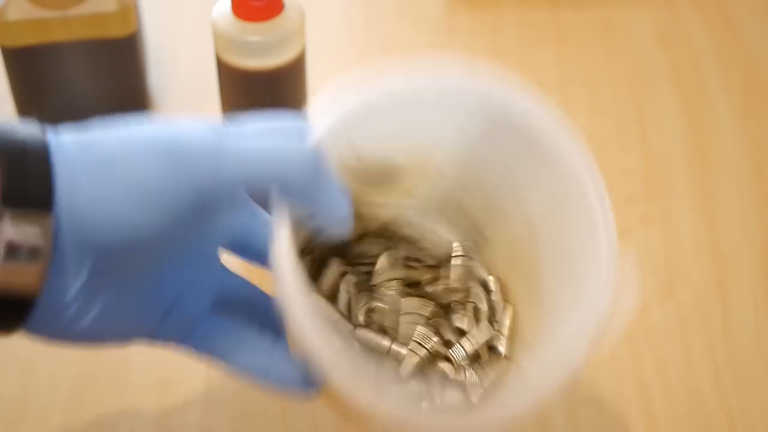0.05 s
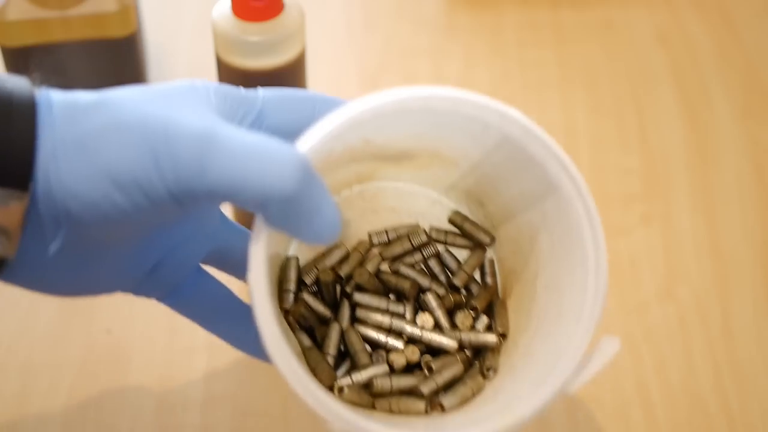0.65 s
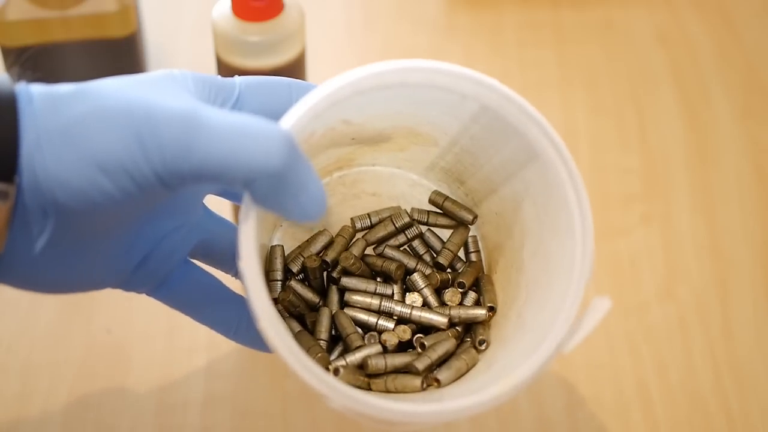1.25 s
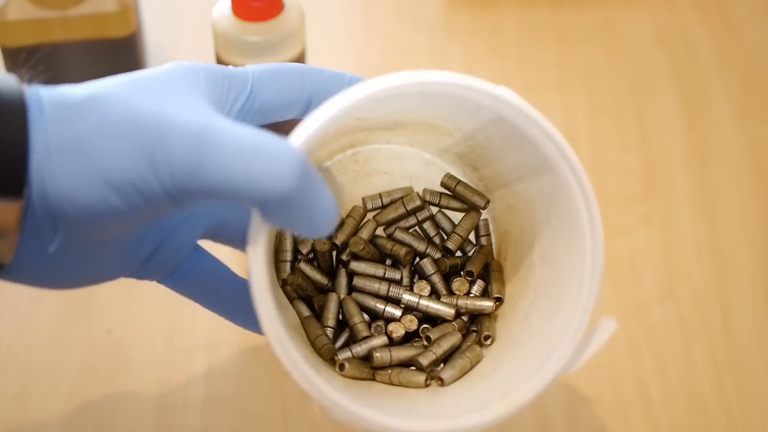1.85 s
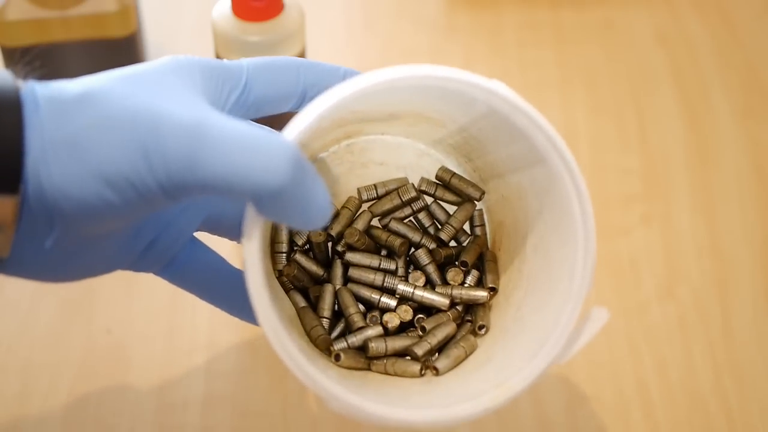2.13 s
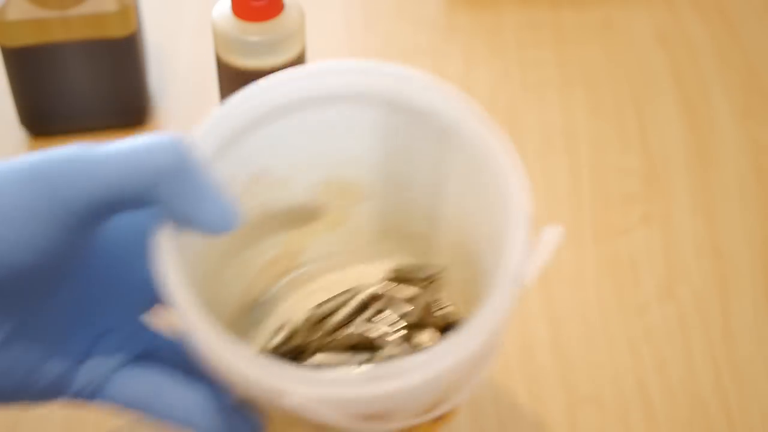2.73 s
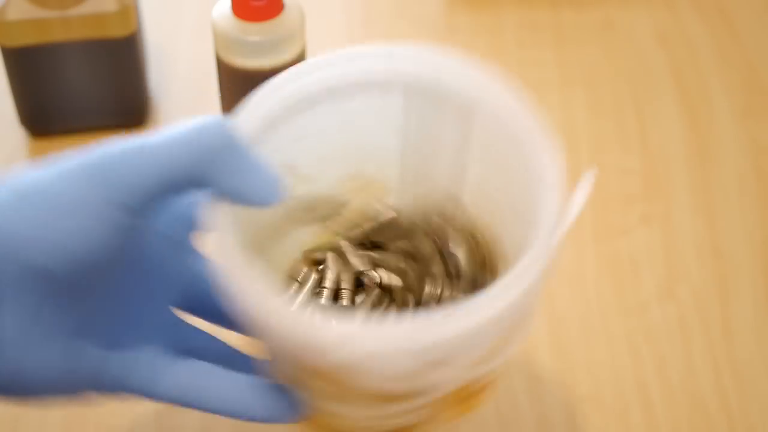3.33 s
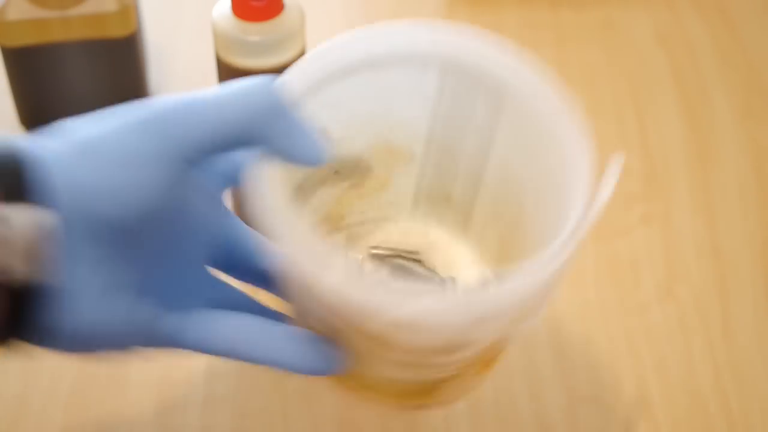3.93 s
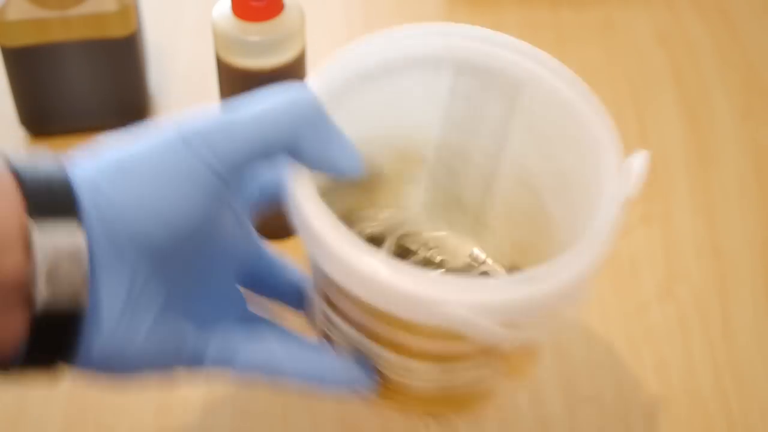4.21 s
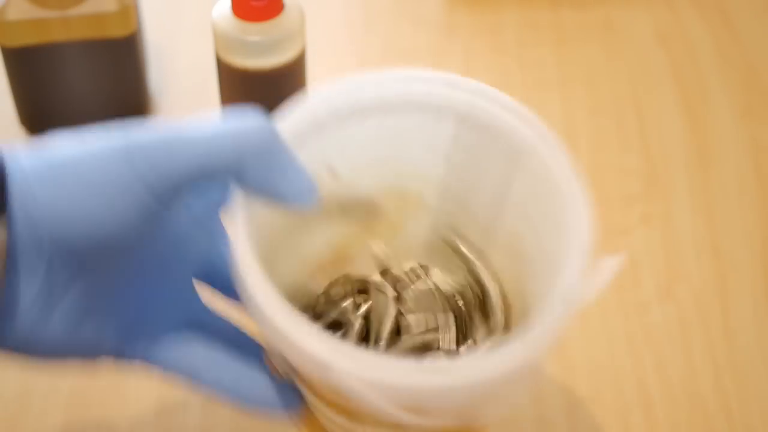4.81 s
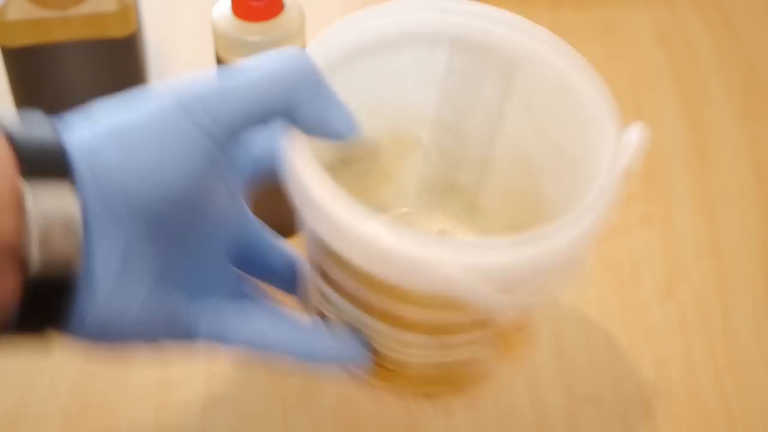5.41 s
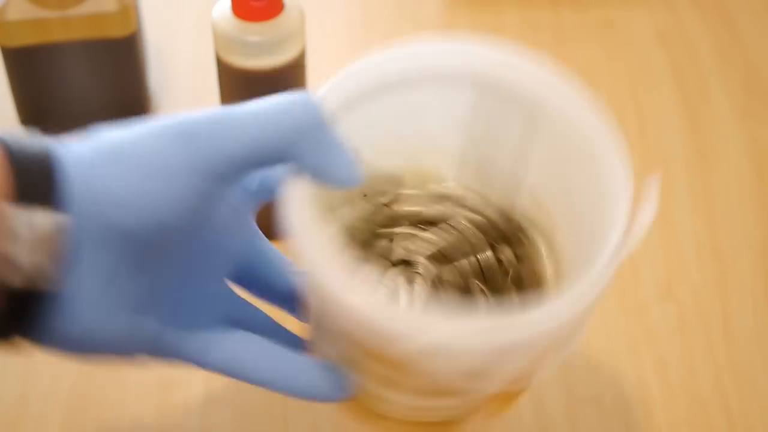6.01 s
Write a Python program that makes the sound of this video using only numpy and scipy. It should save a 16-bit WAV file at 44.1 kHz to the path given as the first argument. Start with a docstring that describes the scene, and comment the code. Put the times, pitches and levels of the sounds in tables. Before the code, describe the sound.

Close to the microphone, a short rattle of bullets swirled in a plastic bucket stops almost at once. Soft ventilation, a faint hum and slight rubbing from a gloved grip fill the gap. Then a longer bout of swirling begins: dense metallic clatter with hard clacks, bright ticks and hollow thumps, surging with each quick turn of the hand. The small room adds a short echo.

```python
"""Metal bullets swirled in a small plastic bucket, close in front of the microphone in a quiet room.
They clack against each other and the wall and drum on the plastic bottom, surging as each turn of the
hand throws the heap and lets it fall back. The swirl stops, the gloved hand shifts its grip, and a
longer bout begins. The bucket sits narrow in the centre; a short room tail, soft ventilation and a
faint mains hum lie behind it."""
import sys
import numpy as np
from scipy import signal
from scipy.fft import rfft, irfft
from scipy.io import wavfile
from scipy.ndimage import uniform_filter1d

SR = 44100
rng = np.random.default_rng(int(sys.argv[2]) if len(sys.argv) > 2 else 0)


def wrap_up_sound(samples):
    """Save the sound to the file named by the first command line argument, as 16-bit audio."""
    columns = np.atleast_2d(samples).T
    # keep every value between -1 and 1, then stretch to whole-number steps
    tamed = np.clip(columns, -1, 1)
    steps = np.round(tamed * 32767).astype(np.int16)
    wavfile.write(sys.argv[1], SR, steps)


N = 271656
TAPS = 16384
HZ = np.fft.rfftfreq(TAPS, 1 / SR)

# Levels in the tables are relative: each source adds its own gain.
# single clacks that stand out: start_s, level_db, pitch_hz
HARD_CLACKS = [(0.273, -7.5, 1580), (2.6645, -51, 3460), (2.8847, -42, 3220), (2.927, -39, 1600),
               (2.9746, -26, 1640), (3.038, -7.5, 1610), (3.0578, -4.5, 2360), (3.0904, -3, 2380),
               (3.1804, -9, 2520), (3.3223, -4, 2080), (3.4346, -7.5, 2440), (3.5783, -4.5, 2350),
               (3.7032, -6, 1700), (3.8158, 2.5, 2200), (3.9856, -8.5, 1760), (4.0718, 0.5, 2360),
               (4.1974, -4, 2350), (4.3036, -8.5, 1460), (4.5361, -3.5, 1770), (4.7989, -1, 2420),
               (5.078, -3.5, 1770), (5.1184, -4.5, 1620), (5.249, -7, 1590), (5.3843, -11, 1590),
               (5.7614, -6.5, 1690), (5.9331, -7.5, 1570), (6.0156, -6, 2400), (6.029, -5.5, 1470)]
# tone of a bullet's contact: frequency_hz, level_db
CLACK_SPECTRUM = [(30, -6.5), (100, -30.5), (300, -12.5), (800, 5), (1300, 0), (2000, -1.5), (3300, -2.5),
                  (4500, -4.5), (6000, -14), (8000, -19.5), (11000, -30), (16000, -54.5)]
# tone of the fine clicks: frequency_hz, level_db
CLICK_SPECTRUM = [(1500, -38.5), (4000, 4.5), (6000, 9), (8300, 6.5), (10400, 4), (12000, -7.5),
                  (14000, -30), (16000, -29.5)]
# resonances of the bucket wall: pitch_hz, width_hz, boost_db
WALL_MODES = [(1460, 35, 3.5), (1600, 130, 4.5), (1795, 290, 5), (2450, 250, 5), (3330, 570, 2.5),
              (4160, 320, 2), (5130, 250, 5.5)]
# knocks on the bottom, from light bumps to heavy falls: start_s, level_db
BOTTOM_THUMPS = [(0.017, 0.5), (0.169, -4.5), (0.273, -2.5), (2.283, -40), (2.598, -41), (2.928, -29.5),
                 (2.956, -22), (2.997, -12), (3.028, -6), (3.067, -9), (3.162, -2.5), (3.271, -2),
                 (3.447, -0.5), (3.547, 1), (3.649, -5), (3.802, -3), (3.942, -4), (3.984, -6), (4.07, -4),
                 (4.556, -4), (4.615, -4.5), (4.683, -2.5), (4.785, -1.5), (5.005, -3), (5.087, -4.5),
                 (5.124, -14), (5.171, -2.5), (5.636, -14), (5.821, -6), (6.046, -3)]
# modes of the loaded bottom and the air above it: pitch_hz, width_hz, level_db
BOTTOM_MODES = [(210, 9.3, -21), (284, 25, -16), (350, 54, -16), (425, 76, -15), (485.5, 23, -6),
                (559.6, 23, 2), (549, 16, -15), (608, 15, 0), (693, 16, -15.5), (693, 40, -15.5),
                (735, 42, -10), (873, 34, -18)]
# the heap rolling between surges, one list a bout: time_s, clatter_db, drum_db
ROLLING_BOUTS = [
    [(0.0, -27.5, -14.5), (0.27, -27.5, -19.5), (0.34, -32.5, -25)],
    [(2.93, -48, -41.5), (3.06, -22.5, -13.5), (3.7, -23, -13.5), (4.25, -24, -16), (4.95, -25.5, -19),
     (5.47, -29, -17), (5.85, -25, -13), (6.16, -32.5, -21.5)],
]
# turns of the hand, about four a second, each a throw at the wall and a fall back:
# start_s, throw_length_s, clatter_db, click_db, drum_db, fall_delay_s, fall_db
HAND_TURNS = [(0.0, 0.014, -21, -33, -17, 0.033, -6.5), (0.135, 0.041, -21, -33.5, -12.5, 0.089, -3.5),
              (3.05, 0.048, -26, -38, -14, 0.11, -6), (3.327, 0.054, -22, -34.5, -14, 0.1, -6),
              (3.601, 0.038, -23, -37, -16.5, 0.077, -1), (3.84, 0.039, -22, -35, -15, 0.095, -10),
              (4.069, 0.018, -22, -29, -12.5, 0.11, -1.5), (4.31, 0.032, -21, -31, -10, 0.12, -1.5),
              (4.534, 0.057, -24.5, -32, -12.5, 0.16, -1), (4.787, 0.055, -29, -34.5, -12, .12, -1),
              (5.013, 0.037, -19, -29.5, -11, 0.12, 2.5), (5.258, 0.032, -19, -32, -17, .11, 1.5),
              (5.52, 0.0073, -16, -30.5, -15, 0.11, 1), (5.761, 0.064, -24.5, -38.5, -18, 0.15, -7),
              (6.034, 0.051, -20, -31.5, -15, 0.091, -5.5)]
# the brightest ticks of metal edges: start_s, level_db
EDGE_TICKS = [(0.134, -23), (0.3985, -42), (3.092, -20), (3.6187, -15.5), (3.8137, -17), (3.864, -20),
              (4.0715, -19), (4.3043, -29), (4.361, -25), (5.0115, -22), (5.257, -18), (6.0482, -24)]
# tone of those ticks: frequency_hz, level_db
TICK_SPECTRUM = [(3000, -50.5), (7000, -9), (10500, 1), (13500, -9), (16000, 2)]
# the fingers shifting their hold: peak_s, rise_s, rub_db, flex_db
GRIP_SHIFTS = [(0.68, .03, -69.5, -63), (1.465, 0.019, -83, -47), (1.612, 0.033, -63, -52),
               (1.668, .01, -65, -60), (1.72, 0.02, -76, -53), (2.58, .01, -65, -59),
               (2.664, .01, -62, -50), (2.9, .1, -57, -52)]
# tone of the glove's rubbing: frequency_hz, level_db
RUB_SPECTRUM = [(300, 0), (700, 8.5), (1500, -1), (2400, -3), (3500, -6), (4300, -7), (8000, -13),
                (15000, -20)]
# stereo width of the close bucket: frequency_hz, side_gain_db
BUCKET_WIDTH = [(40, -21.5), (130, -26.5), (380, -41.5), (600, -26.5), (1000, -14.5), (2500, -12),
                (6000, -18), (10500, -19.5), (12500, -8.5), (15000, -1)]
# decay of the room: frequency_hz, t60_s
ROOM_DECAY = [(150, .55), (500, 0.56), (2000, 0.51), (8000, 0.52), (15000, 0.33)]
# stereo width of the room's tail: frequency_hz, side_gain_db
TAIL_WIDTH = [(100, -26), (380, -30), (600, -19), (1000, -8.5), (2000, -10.5), (5000, -9.5), (10000, -11),
              (14000, -6)]
# tone of the ventilation: frequency_hz, level_db
VENT_SPECTRUM = [(15, -37.5), (25, -29.5), (66, -23.5), (85, -24), (125, -12), (165, -12), (205, -4),
                 (260, -10), (420, -8), (720, -18.5), (1150, -26), (1600, -36.5), (4000, -45), (15500, -45)]
# stereo width of the ventilation: frequency_hz, side_gain_db
VENT_WIDTH = [(40, -2), (100, -27.5), (200, -30.5), (400, -24.5), (700, -11), (1000, -3), (1500, 3.5),
              (3500, 5.5), (8000, 0.5), (15000, -3.5)]
# partials of the mains hum: pitch_hz, level_db
MAINS_HUM = [(100, -60), (199.5, -61.5), (398.5, -63)]
# dips in the microphone's response: centre_hz, width_hz, gain_db
MIC_DIPS = [(3910, 46, -4), (4590, 76, -3), (5560, 80, -2.5), (9140, 410, -10.5), (15800, 2500, -11.5)]


def bullets(clattering, clicking, clatter_db=-2, clack_db=-3, snap_db=-15):
    """Bullets knock on each other and on the wall: dense clatter, fine clicks, single hard clacks."""
    dull = causal(curve(CLACK_SPECTRUM) + bells_db(WALL_MODES))
    sharp = causal(curve(CLICK_SPECTRUM))
    clatter = rattle(per_s=2000, spread_db=3.5, t60=0.014, scatter=1.46, span_hz=(920, 10000))
    clicks = rattle(per_s=1400, spread_db=3.5, t60=0.015, scatter=1.9, span_hz=(4000, 12100))
    out = amp(clatter_db) * steadied(through(clatter, dull), seconds=0.041) * clattering
    out += steadied(through(clicks, sharp), seconds=0.05) * clicking
    for start_s, level_db, pitch_hz in HARD_CLACKS:
        knock = through(contact(t60=0.026, scatter=1.54, hz=pitch_hz, q=3.4, clink=2.6), dull)
        snap = through(contact(t60=0.0059, scatter=0.52, hz=8060, clink=0.2), sharp)
        clack = unit_rms(knock) + amp(snap_db) * unit_rms(snap)
        add(out, start_s, amp(level_db + clack_db) * clack / abs(clack[0]).max())
    return out


def contact(t60, scatter, hz, q=4, clink=3.37):
    """Metal meets metal, in mid and side: a snap, milliseconds of scatter and a brief pitched clink."""
    t = np.arange(1024) / SR
    burst = rng.standard_normal((2, len(t))) * amp(-60 * t / t60)
    burst *= scatter / np.linalg.norm(burst, axis=1, keepdims=True)
    burst[:, 0] += [1, rng.choice([-1, 1])]  # the snap lands left or right
    return burst + clink * signal.lfilter(*signal.iirpeak(hz, q, fs=SR), burst)


def collisions(per_s, spread_db):
    """Impacts at random moments: many small, a few large."""
    strength = amp(spread_db * np.minimum(rng.exponential(1, N), 4)) * rng.choice([-1, 1], N)
    return strength * (rng.random(N) < per_s / SR)


def rattle(per_s, spread_db, t60, scatter, span_hz, places=256):
    """Collisions fall among places in the heap, each clinking at its own pitch."""
    hits = collisions(per_s, spread_db)
    place = rng.integers(0, places, N)
    clinks = [contact(t60, scatter, hz) for hz in np.geomspace(*span_hz, places)]
    out = np.zeros((2, N))
    for at in np.flatnonzero(hits):
        add(out, at / SR, hits[at] * clinks[place[at]])
    return out


def bucket_bottom(drumming, gain_db=-3, give_hz=570, dead_share=0.2, load_s=0.0021):
    """The heap drums on the plastic bottom; a heavy fall presses on it and deadens its ring."""
    modes = sum(amp(db) ** 2 * bell(hz, width) for hz, width, db in BOTTOM_MODES)
    ring = causal(10 * np.log10(modes + 1e-12))
    hits = np.array([collisions(per_s=900, spread_db=2.5) for _ in range(2)])
    out = steadied(through(hits, ring), seconds=0.03) * drumming
    pressed = modes * bell(give_hz, width_hz=520) + dead_share * bell(give_hz, width_hz=170) ** 2
    thump = causal(10 * np.log10(pressed + 1e-12))
    thump *= 1 - np.exp(-np.arange(len(thump)) / (load_s * SR))  # the load arrives gradually
    for start_s, level_db in BOTTOM_THUMPS:
        add(out[:1], start_s, amp(level_db) * thump / abs(thump).max())
    return amp(gain_db) * out


def swirling_hand(roll_click_db=-12.5, lull_db=-0.5, lull_lead_s=0.027):
    """Gains of clatter, clicks and drumming: the heap rolls, and each turn throws it and lets it fall."""
    t = np.arange(N) / SR
    power = np.zeros((3, N))
    for bout in ROLLING_BOUTS:
        time_s, clatter_db, drum_db = np.transpose(bout)
        for layer, db in zip(power, (clatter_db, clatter_db + roll_click_db, drum_db)):
            layer += amp(np.interp(t, time_s, db, left=-np.inf, right=-np.inf)) ** 2
    # just before a throw the heap lifts and rolls more quietly
    lulls = sum(swell(turn[0] - lull_lead_s, rise_s=0.017, fade_s=0.017) for turn in HAND_TURNS)
    power *= amp(lull_db * lulls) ** 2
    landing = amp([-24.5, -38.5, -14.5])  # a fall lands mostly on the bottom
    for start_s, length_s, clatter_db, click_db, drum_db, delay_s, fall_db in HAND_TURNS:
        throw = swell(start_s, rise_s=0.006, hold_s=length_s, fade_s=0.027)
        fall = swell(start_s + delay_s, rise_s=0.012, hold_s=0.031, fade_s=0.03)
        power += np.outer(amp([clatter_db, click_db, drum_db]), throw) ** 2
        power += np.outer(landing * amp(fall_db), fall) ** 2
    return np.sqrt(power)


def metal_edges(clicking, tick_db=4, glint_db=-53, usual_click_db=-34, steepness=1.2):
    """Metal edges meet with thin bright ticks, mostly when the heap is thrown hard."""
    colour = causal(curve(TICK_SPECTRUM))
    glints = rattle(per_s=110, spread_db=8, t60=0.016, scatter=3, span_hz=(10000, 14500), places=96)
    force = (clicking / amp(usual_click_db)) ** steepness
    out = amp(glint_db) * unit_rms(through(glints, colour)) * force
    for start_s, level_db in EDGE_TICKS:
        tick = through(contact(t60=0.014, scatter=3, hz=rng.uniform(9750, 13000), clink=0.8), colour)
        add(out, start_s, amp(level_db + tick_db) * tick / abs(tick[0]).max())
    return out


def gloved_grip(rub_gain_db=-1, scrape_hz=3400, scrape_db=7):
    """The grip shifts: glove and settling bullets rub faintly, and the plastic flexes low."""
    colour = causal(curve(RUB_SPECTRUM) + scrape_db * bell(scrape_hz, width_hz=800))
    grains = rattle(per_s=1200, spread_db=2, t60=0.019, scatter=1.5, span_hz=(700, 8970), places=96)
    rub = amp(rub_gain_db) * unit_rms(through(grains, colour))
    plastic = causal(20 * np.log10(bell(210, width_hz=66) + 0.47 * bell(480, width_hz=270) + 1e-6))
    flex = unit_rms(through(collisions(per_s=1400, spread_db=4), plastic))
    return sum(swell(peak_s, rise_s, fade_s=0.026) * (amp(rub_db) * rub + amp(flex_db) * flex)
               for peak_s, rise_s, rub_db, flex_db in GRIP_SHIFTS)


def room_tail(bucket, bass_db=-10, treble_db=-4, onset_s=0.009, turns_per_s=4.1, count=3):
    """The small room's diffuse tail, stronger in the treble; its echoes shift as the bucket circles."""
    hz, t, noise = signal.stft(rng.standard_normal((count, 2, SR)), SR, nperseg=256)
    decay_rate = np.log(1000) / curve(ROOM_DECAY, hz)[:, None]
    decay = np.exp(-decay_rate * t) * np.sqrt(2 * decay_rate / SR)  # equal energy in every band
    wet = amp(curve([(600, bass_db), (1400, treble_db)], hz))[:, None]
    tails = signal.istft(noise * wet * decay, SR, nperseg=256)[1]
    tails *= np.clip(np.arange(tails.shape[-1]) / (onset_s * SR) - 0.5, 0, 1)  # after the direct sound
    turn = turns_per_s * np.arange(N) / SR
    echoes = sum(through(bucket * np.cos(np.pi * (turn + k / count)), tail)
                 for k, tail in enumerate(tails))
    return np.sqrt(2 / count) * echoes


def room_tone(vent_db=-51.5, waver_rad=0.27, swing_db=1.5):
    """Soft ventilation noise all around, and a slightly wavering mains hum in the centre."""
    noise = through(rng.standard_normal((2, N)), causal(curve(VENT_SPECTRUM)))
    air = amp(vent_db) * unit_rms(noise)
    t = np.arange(N) / SR
    knots = np.linspace(0, N / SR, 24)
    for pitch_hz, level_db in MAINS_HUM:
        drift = waver_rad * np.interp(t, knots, rng.standard_normal(len(knots)))
        sag_db = swing_db * np.interp(t, knots, rng.standard_normal(len(knots)))
        air[0] += np.sqrt(2) * amp(level_db - sag_db) * np.sin(2 * np.pi * pitch_hz * t + drift)
    return air


def amp(db):
    """Decibels to gain."""
    return 10 ** (np.asarray(db) / 20)


def unit_rms(x):
    """Scales to an rms of one."""
    return x / np.sqrt(np.mean(x ** 2) + 1e-20)


def curve(points, hz=HZ):
    """Joins (frequency_hz, value) points on a log-frequency axis."""
    frequency_hz, value = np.transpose(points)
    return np.interp(np.log(hz + 1), np.log(frequency_hz + 1), value)


def bell(hz, width_hz):
    """Power response of one resonance."""
    return 1 / (1 + ((HZ ** 2 - hz ** 2) / (width_hz * (HZ + 1))) ** 2)


def bells_db(rows):
    """Response in decibels of a set of peaks or dips."""
    return sum(db * bell(hz, width_hz) for hz, width_hz, db in rows)


def causal(db):
    """The minimum-phase impulse response with this spectrum."""
    cepstrum = irfft(np.log(amp(np.maximum(db, db.max() - 100))))
    cepstrum[1:TAPS // 2] *= 2
    cepstrum[TAPS // 2 + 1:] = 0
    return irfft(np.exp(rfft(cepstrum)))[:TAPS // 2]


def through(x, response):
    """Convolves each channel and keeps the length."""
    return signal.oaconvolve(np.atleast_2d(x), np.atleast_2d(response), axes=1)[:, :x.shape[-1]]


def add(mix, start_s, sound):
    """Mixes a sound in at a time."""
    part = mix[:, round(start_s * SR):][:, :sound.shape[-1]]
    part += sound[..., :part.shape[-1]]


def steadied(x, seconds):
    """Evens out the slow level and leaves the single hits standing."""
    size = int(seconds * SR)
    power = uniform_filter1d(uniform_filter1d(x[0] ** 2, size), size)
    return x / np.sqrt(abs(power) + 1e-4 * power.mean())


def swell(peak_s, rise_s, fade_s, hold_s=0):
    """A gain that builds up to its peak, holds, then dies away."""
    t = np.arange(N) / SR - peak_s
    rising = (np.minimum(t, 0) / rise_s) ** 2
    fading = np.maximum(t - hold_s, 0) / fade_s
    return np.exp(-np.minimum(rising + fading, 30))


def stereo(mid_side, width):
    """Turns mid and side into left and right, as wide as the table says."""
    mid = mid_side[0]
    side = through(mid_side[1], causal(curve(width)))[0]
    return np.array([mid + side, mid - side])


def scene():
    """The bucket close, straight ahead and narrow; the room and its air wider around it."""
    clattering, clicking, drumming = swirling_hand()
    bucket = bucket_bottom(drumming) + bullets(clattering, clicking)
    bucket += metal_edges(clicking) + gloved_grip()
    tail = stereo(room_tail(bucket[0]), TAIL_WIDTH)
    return stereo(bucket, BUCKET_WIDTH) + tail + stereo(room_tone(), VENT_WIDTH)


def record(dry):
    """The microphone: dips in its treble, clipping at full scale, then the band limit."""
    coloured = through(dry, causal(bells_db(MIC_DIPS)))
    low_pass = signal.firwin(511, cutoff=15750, window=("kaiser", 9), fs=SR)
    return signal.oaconvolve(np.clip(coloured, -1, 1), low_pass[None], "same")


dry = scene()
out = record(dry)
wrap_up_sound(out)
```